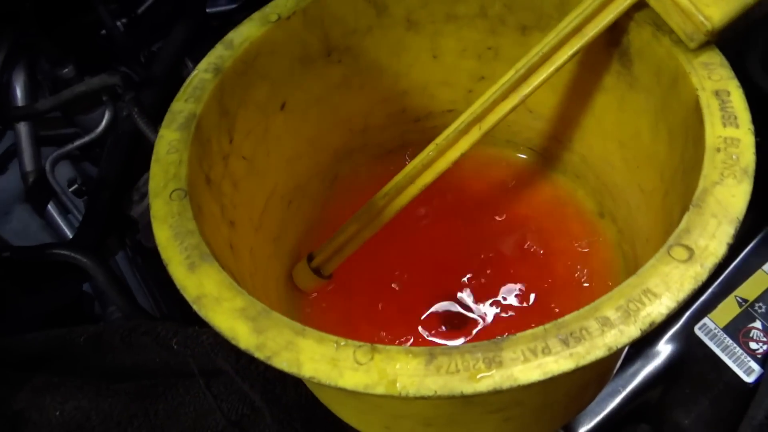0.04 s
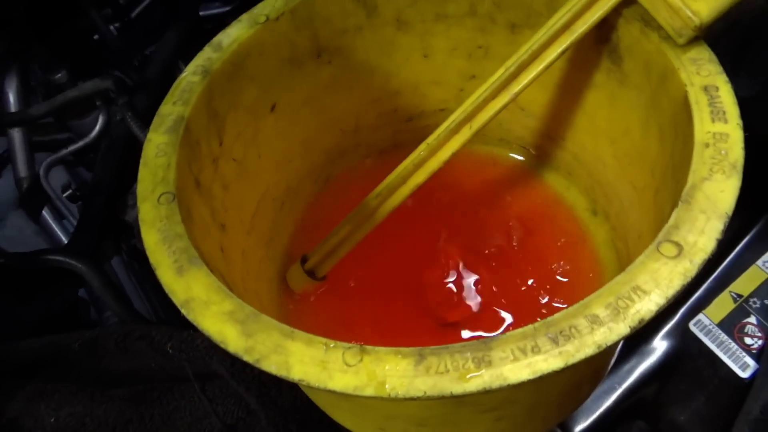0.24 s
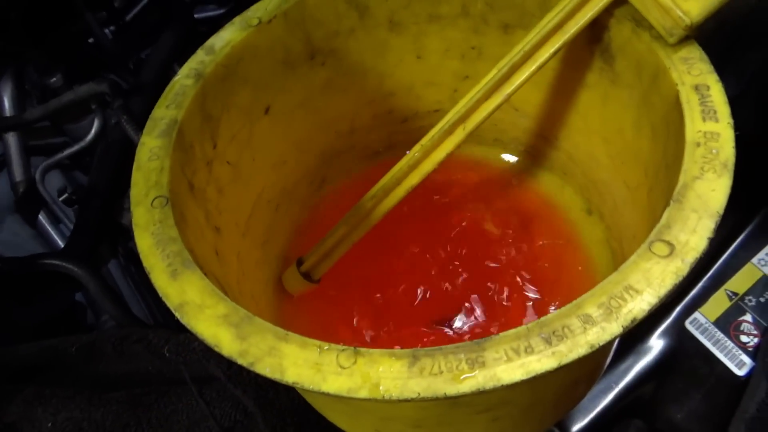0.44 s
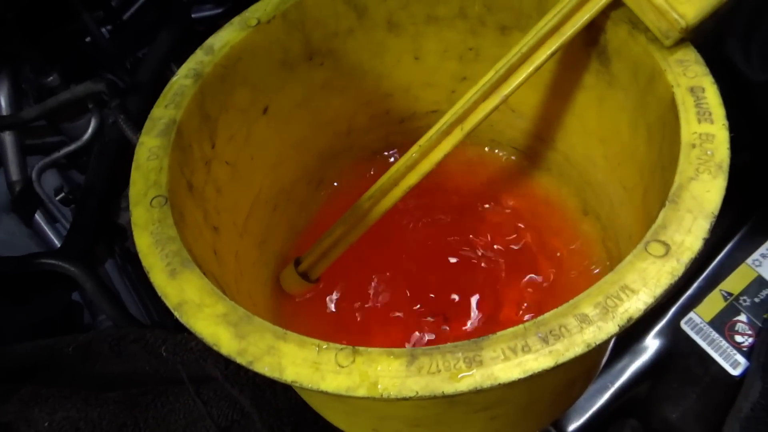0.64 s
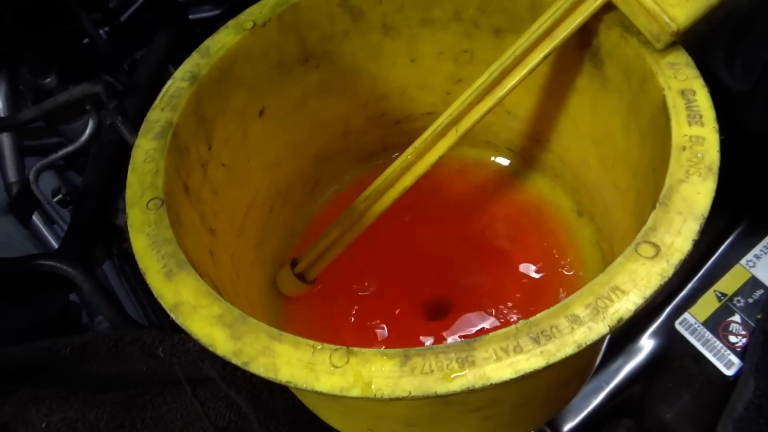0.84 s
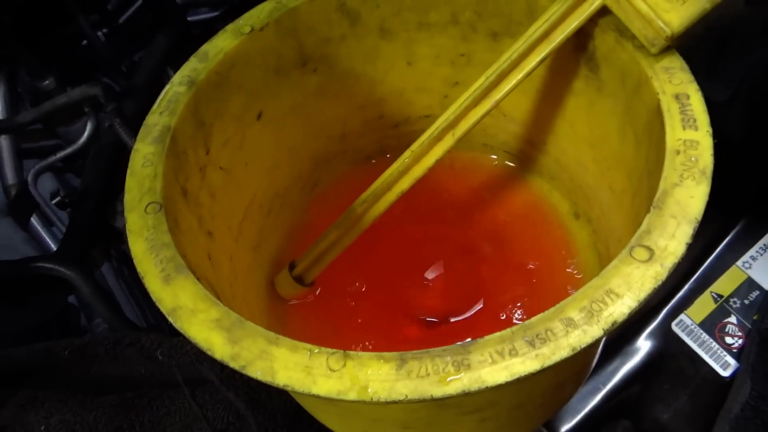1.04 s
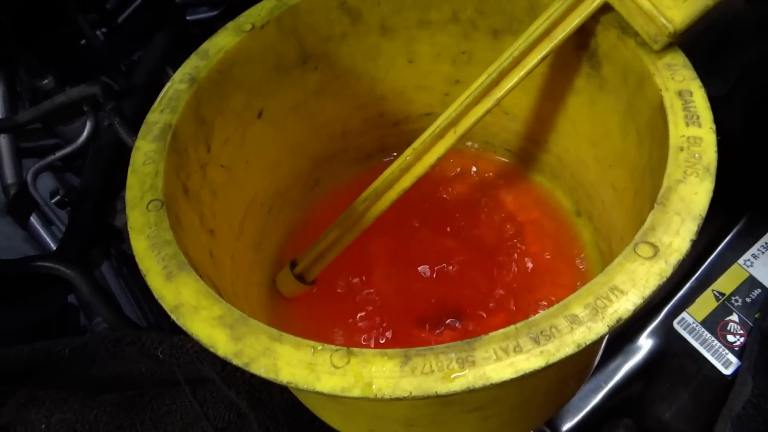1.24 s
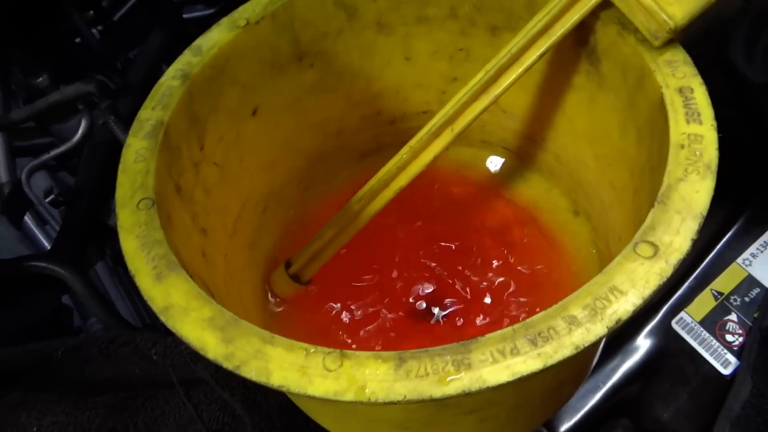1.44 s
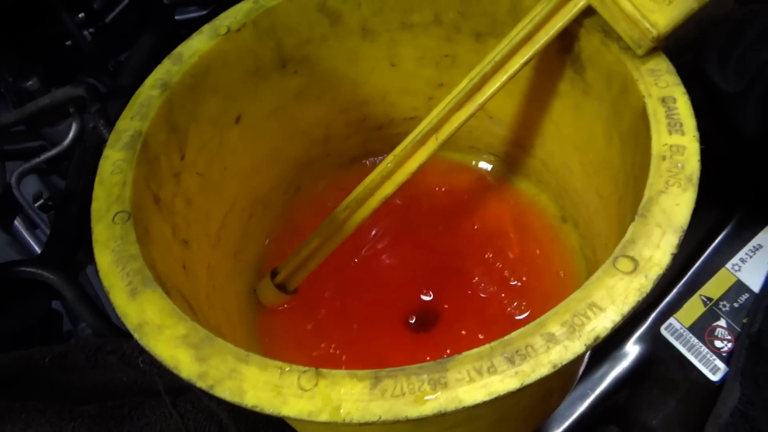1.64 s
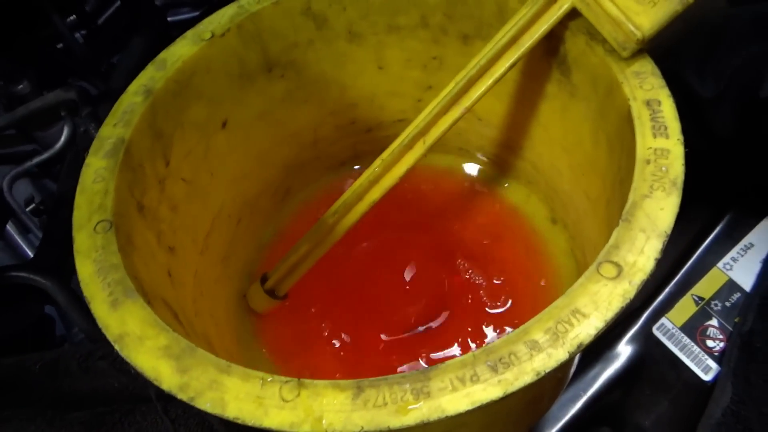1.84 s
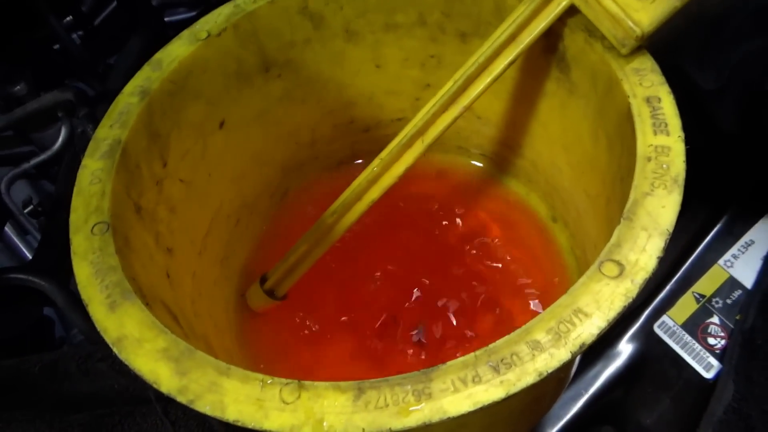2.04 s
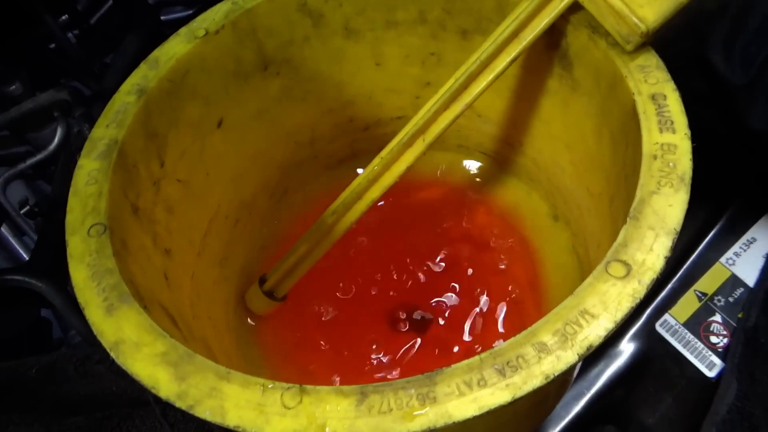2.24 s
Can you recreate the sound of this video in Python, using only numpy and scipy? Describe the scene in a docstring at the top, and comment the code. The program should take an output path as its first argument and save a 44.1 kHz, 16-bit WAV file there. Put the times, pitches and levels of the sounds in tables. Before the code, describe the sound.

Trapped air gurgles up through coolant in a wide funnel, in three wet, popping surges

```python
"""Large air bubbles glug up through coolant in a wide plastic funnel, in a quiet garage, heard from close above.
Each glug is a gliding tone, most often climbing; they gather in three surges of trapped air.
Films burst as short rings with a crack, and many tiny random rings make the fizz and the ticking froth.
Two soft heaves of filtered noise slosh below. Resonant filters ring the funnel's hollow; fading noise gives
the echoes of its walls and of the garage; a faint hiss of slowly drifting level lies underneath."""
import sys
import numpy as np
from scipy import signal
from scipy.fft import rfft, irfft
from scipy.io import wavfile

SR = 44100
rng = np.random.default_rng(int(sys.argv[2]) if len(sys.argv) > 2 else 0)


def to_wav(s):
    """Save 16-bit WAV."""
    ch = np.atleast_2d(s).T  # columns
    pcm = np.round(np.clip(ch, -1, 1) * 32767)  # PCM
    wavfile.write(sys.argv[1], SR, pcm.astype(np.int16))


N = 100856
TIME = np.arange(N) / SR
CUTOFF_HZ = 14300
LN_60_DB = np.log(1000)  # a sound that has faded by 60 dB is 1000 times weaker


def from_db(db):
    """Turn decibels into a plain multiplier."""
    return 10 ** (np.asarray(db) / 20)


def in_time(rows):
    """Join (seconds, value) points by straight lines, giving a value for every sample."""
    return np.interp(TIME, *np.transpose(rows))


def at_hz(points, hz):
    """Read a (Hz, dB) curve at any pitch, with equal steps per octave."""
    point_hz, db = np.transpose(points)
    return np.interp(np.log(hz + 1e-9), np.log(point_hz), db)


def add(out, s, sound):
    """Mix a sound in, starting at s seconds."""
    start = int(np.clip(s * SR, 0, N - 1))
    out[start:start + len(sound)] += sound[:N - start]


def stereo_noise(colour, side, count):
    """Noise shaped by a (Hz, dB) curve; side sets how much left and right differ."""
    white = rng.standard_normal((2, count))
    gain = from_db(at_hz(colour, np.fft.rfftfreq(count, 1 / SR)))
    mid, apart = irfft(rfft(white) * gain, count)
    return mid + side * apart * np.array([[1], [-1]])


def wobble(t):
    """A random wavering: a new random value every 5 ms, joined by straight lines."""
    knots = rng.standard_normal(64)
    return np.interp(t, np.arange(64) * .005, knots)


# Gliding tones of bubbles, and a few short rings of the funnel's hollow. Each row: start in seconds,
# length in seconds, first pitch in Hz, last pitch in Hz, first level in dB, last level in dB
# (pitch and level waver around these).
GLIDING_TONES = [(0.281, 0.068, 219, 533, -41, -26.5), (0.325, 0.053, 226, 416, -29, -34.5),
                 (.34, 0.012, 540, 900, -8.5, -26.5), (0.35, .020, 910, 1566, -23, -17.5),
                 (0.367, 0.052, 671, 997, -20.5, -47), (.372, 0.023, 476, 585, -22.5, -15),
                 (0.407, 0.032, 543, 815, -26, -38), (0.492, 0.051, 531, 1250, -37, -50),
                 (0.4924, 0.013, 3120, 3430, -7.5, -46.5), (.586, 0.0073, 2360, 2960, -38, -45),
                 (0.719, 0.014, 1440, 1460, -44.5, -34.5), (0.755, 0.016, 630, 650, -34, -50.5),
                 (1.04, 0.0043, 620, 616, -31.5, -43), (1.107, 0.018, 280, 344, -49, -45),
                 (1.160, 0.05, 547.4, 1464, -14.5, -36.5), (1.211, 0.011, 600, 780, -31, -44),
                 (1.277, 0.021, 994, 1100, -33, -34.5), (1.315, 0.042, 1096, 1992, -40.5, -30),
                 (1.33, 0.014, 1905, 3525, -39, -27.5), (1.352, 0.0074, 2900, 4260, -25.5, -23.5),
                 (1.359, 0.018, 1850, 2960, -24, -33.5), (1.38, 0.012, 1970, 2320, -29, -38),
                 (1.382, 0.0045, 2800, 3700, -20, -38), (1.4, 0.013, 1110, 1100, -28.5, -40.5),
                 (1.416, 0.032, 1600, 2670, -28.5, -52), (1.51, 0.0092, 610, 450, -40, -40),
                 (1.812, 0.027, 537, 558, -41.5, -43.5), (1.902, 0.015, 1306, 1370, -36, -38.5),
                 (1.951, 0.013, 1380, 1404, -42, -30), (1.974, 0.025, 1077, 1403, -35.5, -33.5),
                 (1.998, 0.087, 940, 1468, -45.5, -42.5), (2.05, 0.017, 1560, 1820, -30, -47),
                 (2.072, .014, 1966, 3100, -28.5, -35), (2.081, 0.011, 1300, 2080, -25.5, -63),
                 (2.139, .008, 2860, 3840, -36, -42), (2.133, 0.023, 2140, 1567, -35, -40),
                 (2.15, 0.03, 974, 1510, -33.5, -36), (2.164, 0.091, 1530, 2146, -40, -67),
                 (2.168, 0.022, 3547, 3780, -36, -41.5), (2.206, .012, 2380, 4600, -44, -54)]
GLUG_ATTACK_S, GLUG_RELEASE_CYCLES = 0.0019, 19  # cycles of the last pitch to fade by 60 dB
GLUG_WOBBLE_SHARE, GLUG_WOBBLE_DB = 0.012, 2.2


def glugs():
    """A large bubble rings as one tone, its pitch gliding mostly up; a few rows are rings of the hollow."""
    out, t = np.zeros(N), np.arange(SR // 8) / SR
    for s, length, first_hz, last_hz, first_db, last_db in GLIDING_TONES:
        way = np.minimum(t / length, 1)  # 0 at the start, 1 once the glide is done
        hz = first_hz + (last_hz - first_hz) * way
        hz = hz * (1 + GLUG_WOBBLE_SHARE * wobble(t))
        db = first_db + (last_db - first_db) * way + GLUG_WOBBLE_DB * wobble(t)
        attack = np.minimum(t / GLUG_ATTACK_S, 1)
        release = np.exp(-LN_60_DB * np.maximum(t - length, 0) * last_hz / GLUG_RELEASE_CYCLES)
        tone = np.sin(2 * np.pi * np.cumsum(hz) / SR)
        add(out, s, from_db(db) * release * attack * tone)
    return out


POP_ATTACK_S, POP_RISE_SHARE = 0.00022, 0.11  # share of its pitch that a pop gains while it fades by 60 dB


def pop(hz, t60):
    """A bursting bubble: a short ring of the air inside, rising as the hole widens."""
    t = np.arange(int(t60 * SR) + 8) / SR
    shape = (1 - np.exp(-t / POP_ATTACK_S)) * np.exp(-LN_60_DB * t / t60)
    ring = np.sin(2 * np.pi * hz * t * (1 + .5 * POP_RISE_SHARE * t / t60))
    flow = shape / shape.max() * ring
    # we hear the change of the air flow; the division keeps the level alike at every pitch
    return np.diff(flow, prepend=0) / (2 * np.sin(np.pi * hz / SR))


SNAP_T60_S = .005  # time to fade by 60 dB


def snap(hz):
    """A film tearing: a short, grainy crack around the bubble's pitch, of peak 1."""
    t = np.arange(256) / SR
    crack = rng.standard_normal(len(t)) * np.exp(-LN_60_DB * t / SNAP_T60_S)
    band_hz = [.5 * hz, min(2 * hz, CUTOFF_HZ)]
    crack = signal.sosfilt(signal.butter(2, band_hz, "band", fs=SR, output="sos"), crack)
    return crack / abs(crack).max()


# Films bursting at the surface. Each row: start in seconds, pitch in Hz, level in dB,
# time in seconds for the ring to fade by 60 dB.
BURSTING_FILMS = [(0.018, 2330, -35, 0.0084), (0.1948, 10100, -25.5, 0.0019), (0.249, 2560, -20, 0.0047),
                  (0.2624, 2310, -34, 0.007), (.272, 2280, -52, 0.0053), (0.3014, 1350, -27, 0.027),
                  (0.3084, 2480, -16.5, 0.011), (0.31, 1180, -6, 0.00063), (0.311, 8770, -19.5, 0.012),
                  (0.3188, 2600, -22.5, 0.0081), (0.347, 2830, -16, 0.0094), (0.3496, 4160, -18.5, 0.022),
                  (0.4042, 4900, -28, 0.017), (0.4068, 6970, -23, 0.0068), (0.4181, 3820, -27, 0.067),
                  (0.4647, 2370, -23.5, 0.0096), (0.489, 2200, -8, 0.0057), (0.4872, 2700, -16, 0.036),
                  (0.5116, 2600, -22, 0.0076), (0.5189, 4070, -17.5, 0.0053), (0.5417, 6300, -18, 0.00022),
                  (0.557, 2660, -28, 0.011), (0.607, 4550, -11.5, 0.00037), (0.693, 6270, -25, 0.0023),
                  (0.7168, 760, -31, 0.011), (0.7801, 3260, -19.5, 0.00022), (.894, 820, -41.5, 0.02),
                  (.909, 9650, -28, 0.0028), (1.019, 2440, -34.5, 0.0046), (1.0822, 2970, -22, 0.005),
                  (1.1119, 1690, -35, 0.008), (1.1314, 2130, -37, 0.013), (1.1604, 2330, -14.5, 0.01),
                  (1.1832, 4080, -23, 0.011), (1.228, 10550, -26.5, 0.013), (1.2472, 2700, -23.5, 0.0021),
                  (1.276, 4100, -25, 0.017), (1.307, 3410, -23, 0.0037), (1.3175, 7700, -26, 0.0074),
                  (1.319, 1480, -27.5, 0.014), (1.342, 6860, -2.5, 0.0006), (1.3662, 5920, -8.5, 0.0035),
                  (1.389, 6200, -26, 0.0016), (1.3996, 4540, -19, 0.00039), (1.4258, 5340, -17.5, 0.0096),
                  (1.497, 8660, -21, 0.0016), (1.4993, 1340, -25.5, 0.0022), (1.5077, 3170, -26.5, 0.0029),
                  (1.884, 1360, -26.5, 0.013), (1.8924, 3760, -28.5, 0.0056), (1.900, 2340, -27, 0.0077),
                  (1.9535, 2650, -16, 0.0037), (2.0361, 2900, -23, 0.0019), (2.0704, 9600, -22, 0.0041),
                  (2.087, 4620, -20.5, 0.0029), (2.0962, 8450, -17, 0.0063), (2.1022, 3970, -20.5, 0.0082),
                  (2.117, 4870, -24.5, 0.016), (2.1568, 9900, -18.5, 0.0026), (2.1825, 3500, -26, 0.0059)]
SNAP_DB, DAUGHTER_DB = -9, -12  # levels against the ring
DAUGHTER_COUNT, DAUGHTER_SPAN_S = 4, .008
SMALL_BUBBLE_CYCLES = 22  # cycles to fade by 60 dB, for daughters; the fizz varies around it


def pops():
    """The distinct bursts: the film snaps, the air inside rings, and a few daughter bubbles follow."""
    out = np.zeros(N)
    for s, hz, db, t60 in BURSTING_FILMS:
        add(out, s, from_db(db) * pop(hz, t60))
        add(out, s, from_db(db + SNAP_DB) * snap(hz))
        daughters = rng.uniform((0, .6), (DAUGHTER_SPAN_S, 1.6), (DAUGHTER_COUNT, 2))
        for delay, ratio in daughters:
            own_hz = min(hz * ratio, CUTOFF_HZ)
            gain = from_db(db + DAUGHTER_DB) * np.exp(-delay / DAUGHTER_SPAN_S)  # later ones are weaker
            add(out, s + delay, gain * pop(own_hz, SMALL_BUBBLE_CYCLES / own_hz))
    return out


# How hard the surface churns. Each row: time in seconds, strength in dB.
SURFACE_CHURN = [(0, -13), (.04, -15), (.08, -35.5), (.22, -27), (.26, -11), (.33, -1), (.43, -2),
                 (.52, -11), (.66, -43.5), (.74, -26), (1.02, -33.5), (1.11, 0.5), (1.22, -6.5),
                 (1.3, -14.5), (1.36, -11), (1.46, -23.5), (1.51, -16), (1.6, -35), (1.86, -27.5),
                 (1.9, -9.5), (2.0, -29), (2.17, -8), (2.28, -39)]
# How loud the small bubbles are by pitch. Each row: pitch in Hz, level in dB.
FIZZ_BY_PITCH = [(400, -20.5), (800, -5.5), (1400, 2), (2500, 3.5), (4500, -4), (9000, -5.5), (12000, -22)]
FIZZ_PER_S, FIZZ_DB, FIZZ_SPREAD_DB = 2400, -43.5, 5  # rate and base level when the churn is at 0 dB
FIZZ_FOLLOWS = .8  # share of the churn's dB that goes into loudness; the rest goes into the rate


def fizz():
    """Small bubbles burst at random, more often and louder while the surface churns."""
    out, churn_db = np.zeros(N), in_time(SURFACE_CHURN)
    chance, pitch, size = rng.random(N), rng.random(N), rng.exponential(1, N)
    life = rng.uniform(0.81, 1.82, N)
    low_hz, high_hz = FIZZ_BY_PITCH[0][0], FIZZ_BY_PITCH[-1][0]
    rate = FIZZ_PER_S * from_db((1 - FIZZ_FOLLOWS) * churn_db)
    for i in np.flatnonzero(chance < rate / SR):
        hz = low_hz * (high_hz / low_hz) ** pitch[i]
        db = FIZZ_DB + FIZZ_FOLLOWS * churn_db[i] + at_hz(FIZZ_BY_PITCH, hz)
        db += FIZZ_SPREAD_DB * min(size[i], 3)
        add(out, i / SR, from_db(db) * pop(hz, SMALL_BUBBLE_CYCLES * life[i] / hz))
    return out


# How lively the ticking froth is. Each row: time in seconds, strength in dB.
FROTH_LIVELINESS = [(0, -65), (.22, -20), (.31, -13), (.46, -8.5), (.8, -19.5), (1.02, -43), (1.26, -10),
                    (1.38, 0), (1.45, -20), (1.55, -10.5), (1.62, -29), (1.99, -25), (2.16, -4),
                    (2.28, -15)]
SPRAY_PER_S, SPRAY_DB, SPRAY_SPREAD_DB = 310, -38.5, 9  # rate and base level at 0 dB liveliness
SPRAY_LOW_HZ, SPRAY_HIGH_HZ, SPRAY_CYCLES = 4100, 11930, 9.2


def spray():
    """The tiniest bubbles tick briefly, each at its own pitch, in the froth that a surge leaves."""
    out, lively_db = np.zeros(N), in_time(FROTH_LIVELINESS)
    chance, size, pitch = rng.random(N), rng.exponential(1, N), rng.random(N)
    life = rng.uniform(.5, 2.5, N)
    rate = SPRAY_PER_S * from_db(.5 * lively_db)  # half the dB goes into rate, half into loudness
    for i in np.flatnonzero(chance < rate / SR):
        hz = SPRAY_LOW_HZ + (SPRAY_HIGH_HZ - SPRAY_LOW_HZ) * pitch[i]
        db = SPRAY_DB + .5 * lively_db[i] + SPRAY_SPREAD_DB * min(size[i], 2)
        add(out, i / SR, from_db(db) * pop(hz, SPRAY_CYCLES * life[i] / hz))
    return out


# The liquid heaving. Each row: time of the strongest moment in seconds, level in dB.
LIQUID_HEAVES = [(0.332, -36), (1.12, -52)]
# Tone of the slosh. Each row: pitch in Hz, level in dB.
SLOSH_COLOUR = [(50, -24), (150, -26), (600, -17.5), (2000, -75)]
HEAVE_WIDTH_S = 0.046


def heaves():
    """A soft low slosh as a pocket of air lifts the liquid: noise that swells and fades."""
    slosh = stereo_noise(SLOSH_COLOUR, 0, count=N)[0]
    swell = sum(from_db(db) * np.exp(-abs(TIME - s) / HEAVE_WIDTH_S) for s, db in LIQUID_HEAVES)
    return slosh / slosh.std() * swell


# Air ringing in the funnel's hollow. Each row: pitch in Hz, gain in dB,
# time in seconds for the ring to fade by 60 dB.
HOLLOW_RINGS = [(575, -11, .09), (790, -10, .06), (1385, 3, .06), (1440, 0, .06), (2340, -1, .035),
                (2770, -4, .06), (3230, -6, .05), (3750, -6, .04), (4680, -5, .05)]


def funnel(x):
    """The hollow's air resonates at a few pitches, each added to the direct sound."""
    out = x
    for hz, db, t60 in HOLLOW_RINGS:
        r = np.exp(-LN_60_DB / (t60 * SR))  # how much of the ring survives each sample
        feed = (1 - r * r) / 2 * np.array([1, 0, -1])
        feedback = [1, -2 * r * np.cos(2 * np.pi * hz / SR), r * r]
        out = out + from_db(db) * signal.lfilter(feed, feedback, x + 1e-18)
    return out


def reverberate(x, colour, t60, side):
    """Dense reflections build up within 2.2 ms and die away, like fading noise."""
    t = TIME[:SR // 2]
    fade = np.exp(-LN_60_DB * t / t60) * np.minimum(t / 0.0022, 1)
    tail = stereo_noise(colour, side, count=SR // 2) * fade / np.sqrt(np.sum(fade ** 2))
    return signal.fftconvolve(x[None], tail, axes=1)[:, :N]


# Tone of the echoes from the funnel's walls. Each row: pitch in Hz, level in dB.
WALL_COLOUR = [(200, -62), (900, -7.5), (2000, 1.5), (5000, -5.5), (14000, -7.5)]


def wall_echoes(x):
    """The funnel's close walls scatter the sound into a very short tail."""
    return reverberate(x, WALL_COLOUR, t60=0.02, side=0.21)


# Tone of the garage's echo. Each row: pitch in Hz, level in dB.
ROOM_COLOUR = [(100, -68), (500, -18), (6000, -17), (14000, -14.5)]


def garage_echo(x):
    """The garage reflects the sound from farther surfaces, so its tail lasts longer."""
    return reverberate(x, ROOM_COLOUR, t60=0.3, side=0.5)


# Tone of the hiss. Each row: pitch in Hz, relative level in dB per Hz.
HISS_COLOUR = [(100, -6), (200, -12.5), (400, 1.5), (680, 3), (1340, -6.5), (2400, -3.5), (5000, -6),
               (9000, -8), (12000, -14.5), (15000, -16.5)]
# Loudness of the hiss. Each row: time in seconds, level in dB.
HISS_LOUDNESS = [(0, -54.5), (.65, -54.5), (1.62, -50.5), (2.29, -53)]


def background_hiss():
    """Faint noise with a fixed tone and a slowly drifting level."""
    hiss = stereo_noise(HISS_COLOUR, side=0.48, count=N)
    return hiss / hiss.std() * from_db(in_time(HISS_LOUDNESS))


PAN_DB = 0.57  # raises the left and lowers the right


def scene():
    """Bubbles in the funnel, the gliding tones a little to the left; the garage around it and the hiss."""
    large = glugs()
    small = pops() + fizz() + spray() + heaves()
    near = funnel(large) * from_db([[PAN_DB], [-PAN_DB]]) + funnel(small)
    walls = wall_echoes(large + small)
    garage = garage_echo(near.mean(axis=0))
    return near + walls + garage + background_hiss()


MIC_LOW_HZ = 171


def record(dry):
    """The microphone sheds the bass; the top is cut steeply."""
    thin = signal.sosfilt(signal.butter(2, MIC_LOW_HZ, "high", fs=SR, output="sos"), dry)
    return signal.sosfilt(signal.ellip(10, .2, 70, CUTOFF_HZ, fs=SR, output="sos"), thin)


dry = scene()
out = record(dry)
to_wav(out)
```